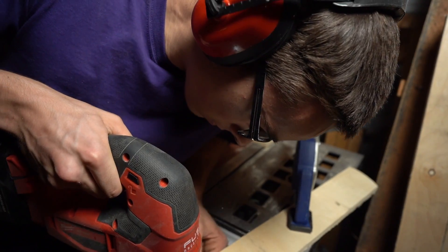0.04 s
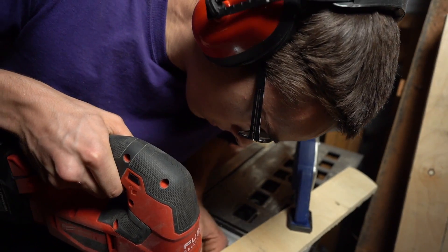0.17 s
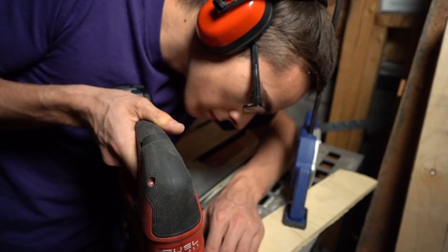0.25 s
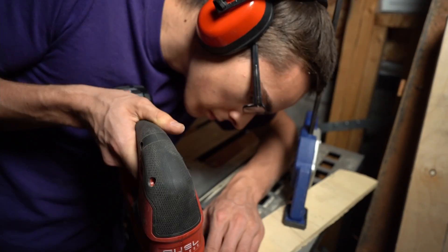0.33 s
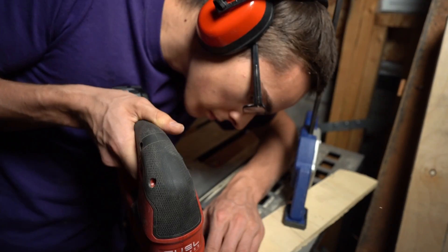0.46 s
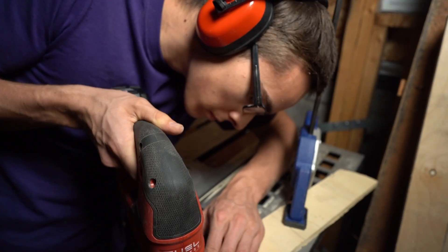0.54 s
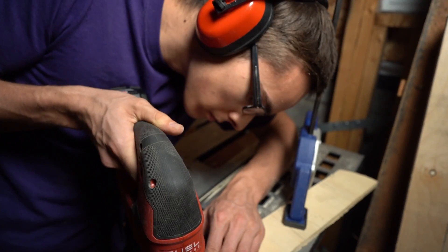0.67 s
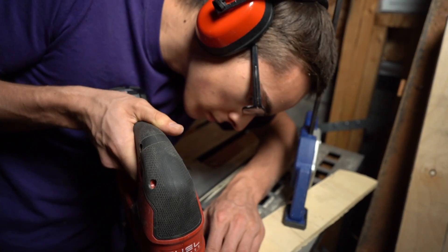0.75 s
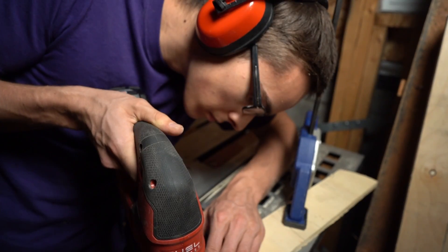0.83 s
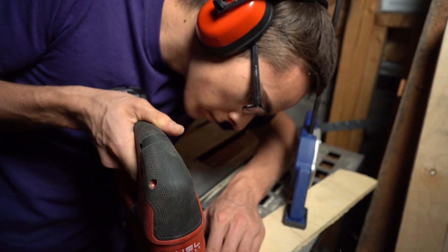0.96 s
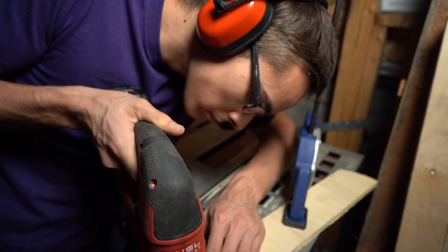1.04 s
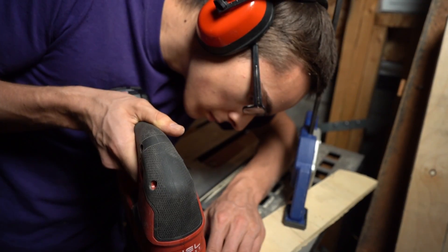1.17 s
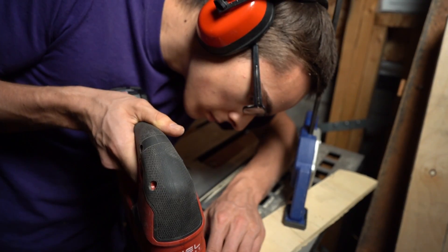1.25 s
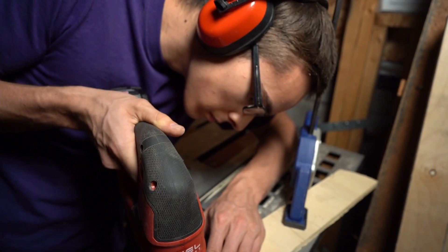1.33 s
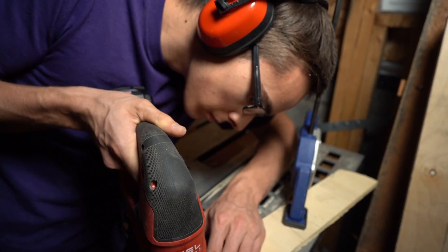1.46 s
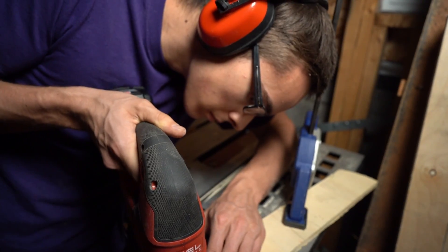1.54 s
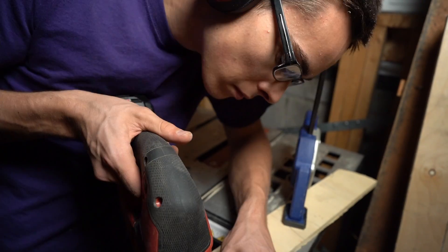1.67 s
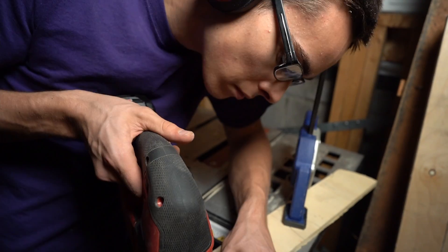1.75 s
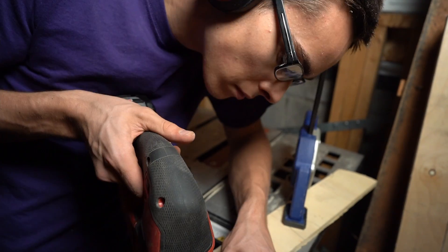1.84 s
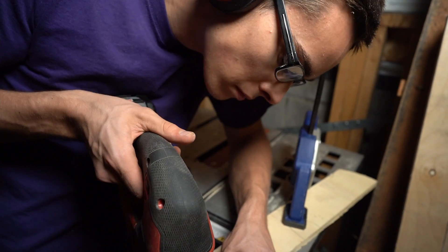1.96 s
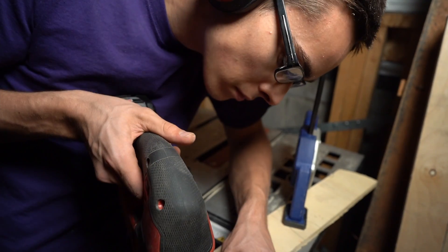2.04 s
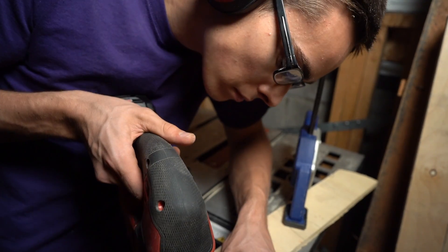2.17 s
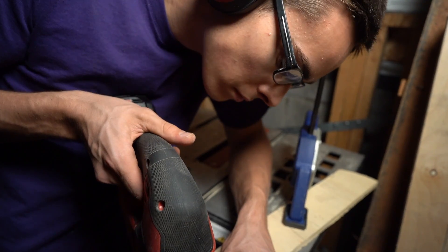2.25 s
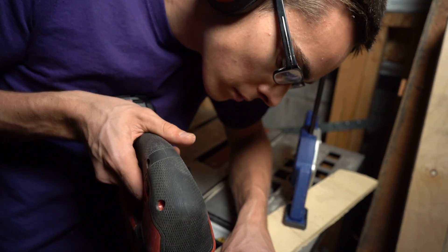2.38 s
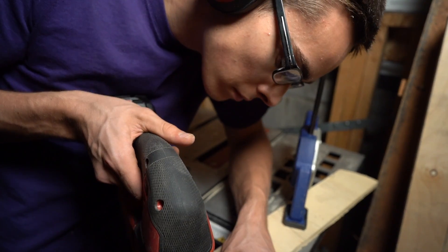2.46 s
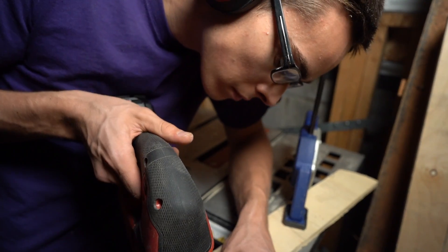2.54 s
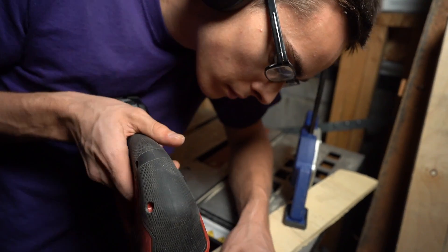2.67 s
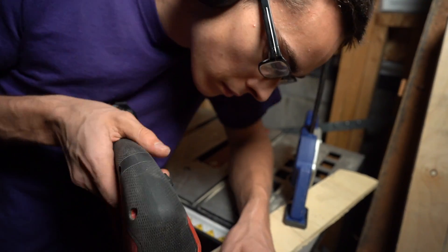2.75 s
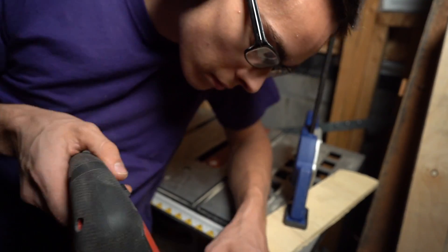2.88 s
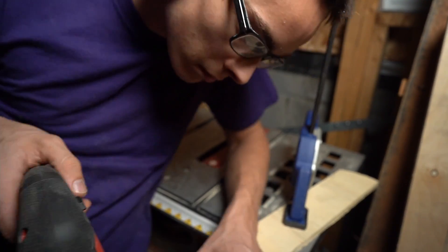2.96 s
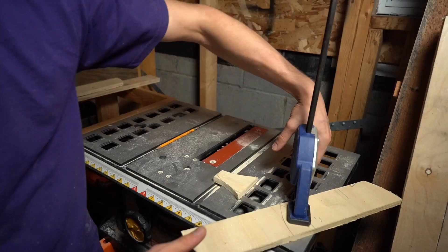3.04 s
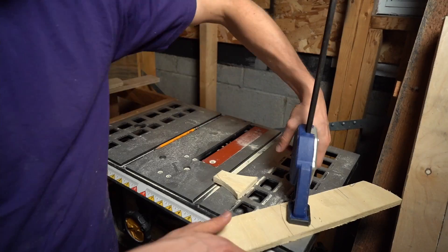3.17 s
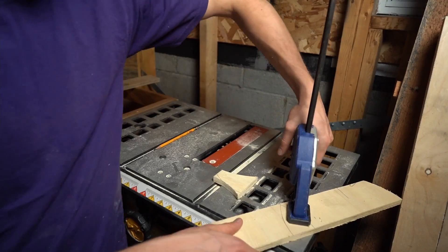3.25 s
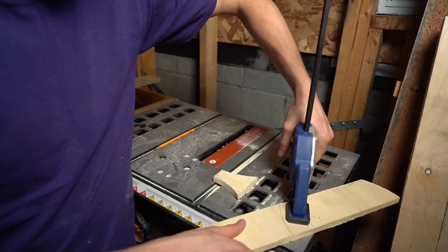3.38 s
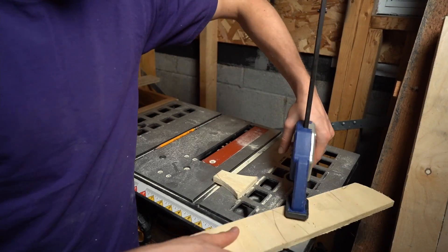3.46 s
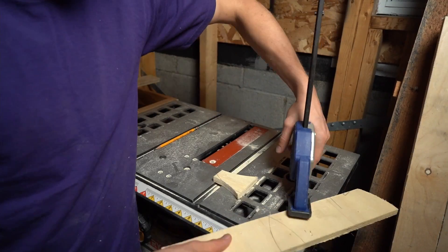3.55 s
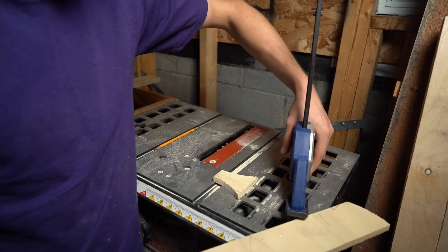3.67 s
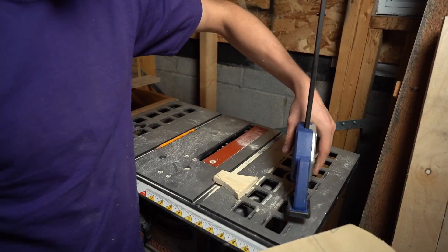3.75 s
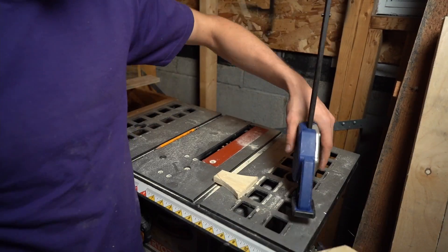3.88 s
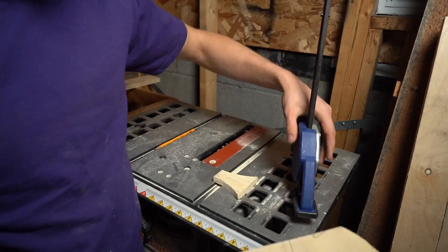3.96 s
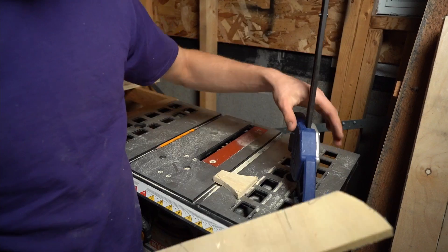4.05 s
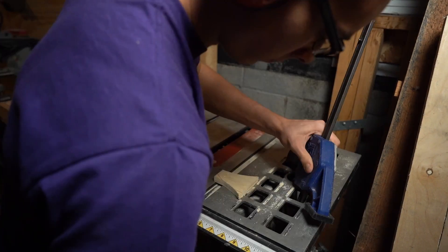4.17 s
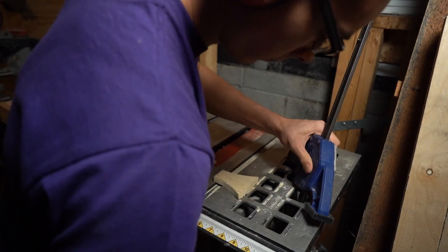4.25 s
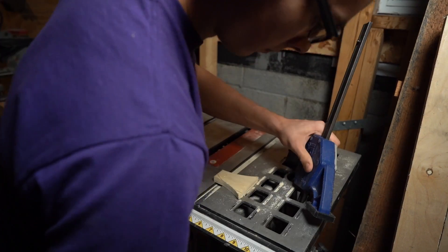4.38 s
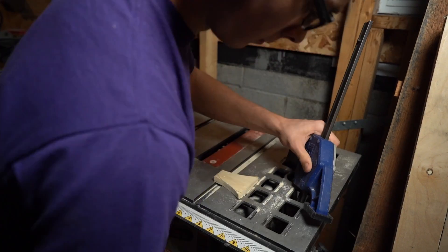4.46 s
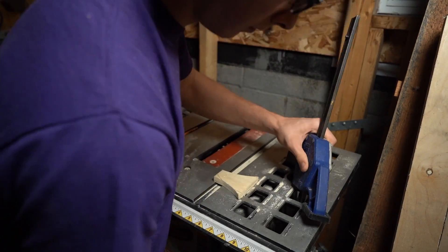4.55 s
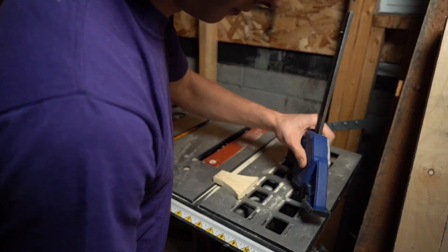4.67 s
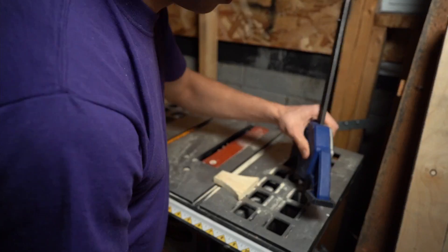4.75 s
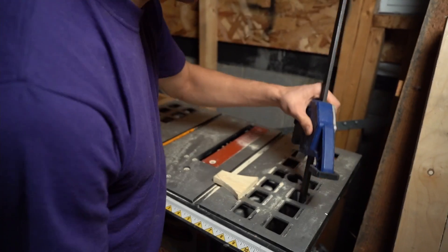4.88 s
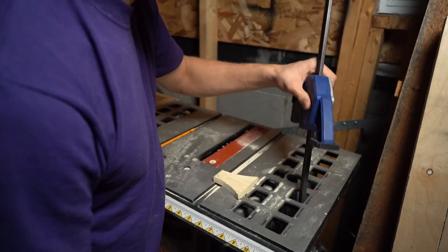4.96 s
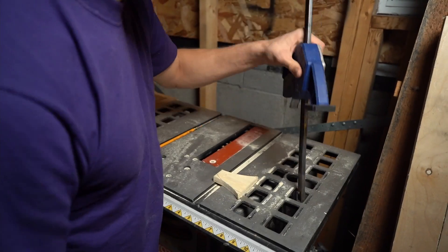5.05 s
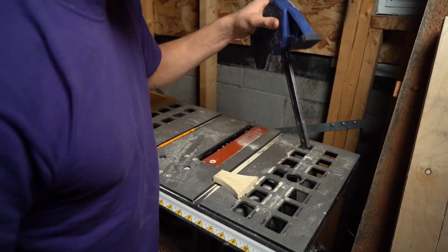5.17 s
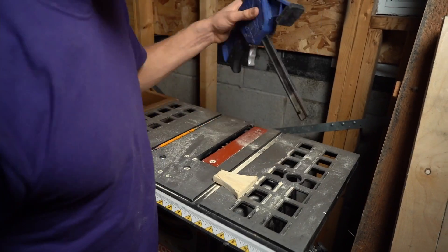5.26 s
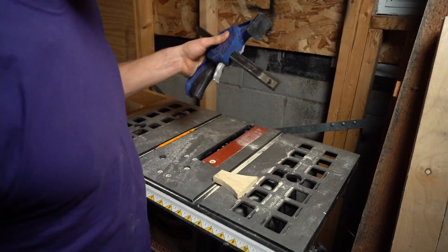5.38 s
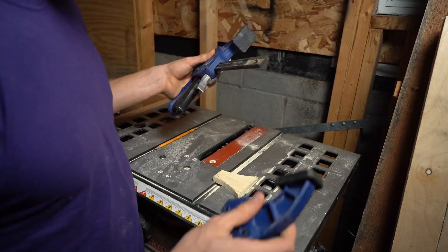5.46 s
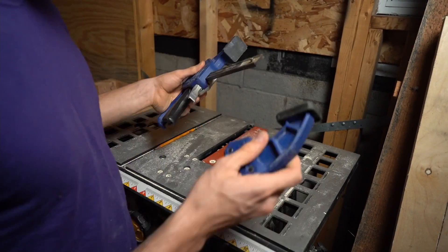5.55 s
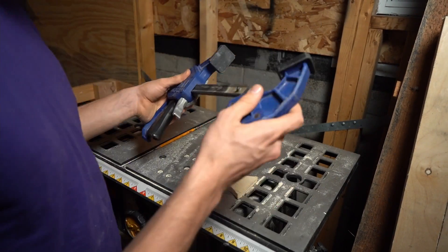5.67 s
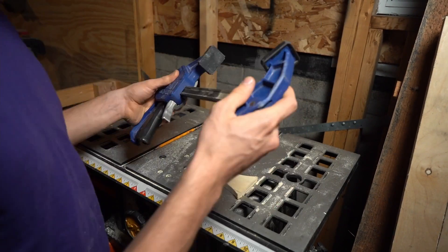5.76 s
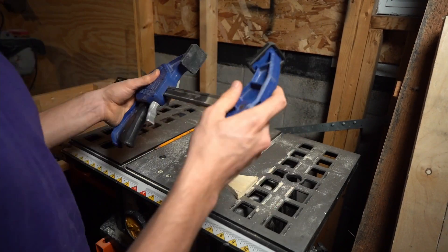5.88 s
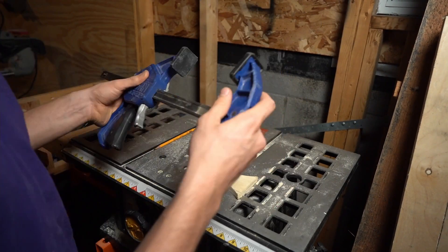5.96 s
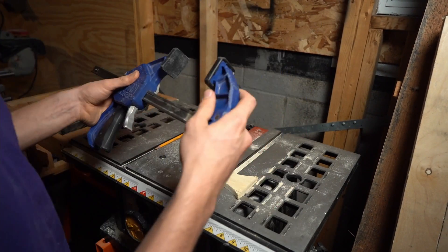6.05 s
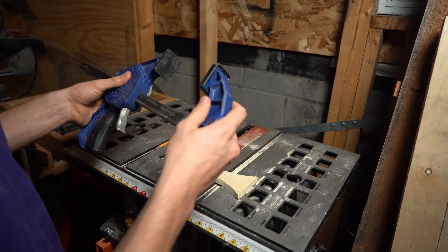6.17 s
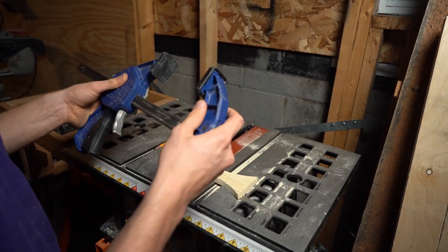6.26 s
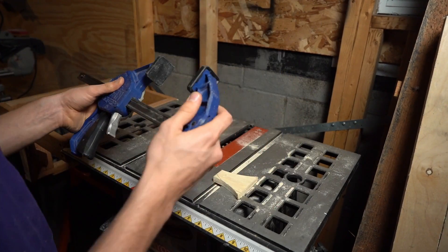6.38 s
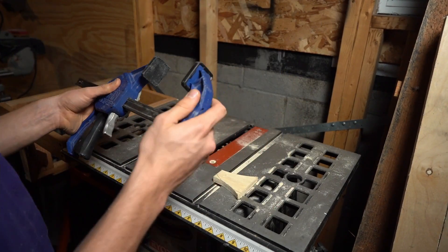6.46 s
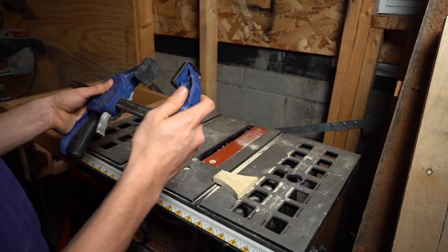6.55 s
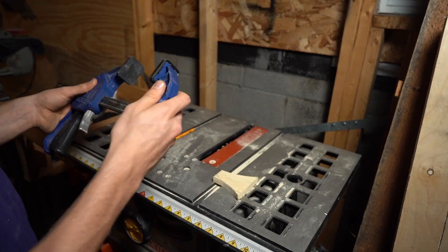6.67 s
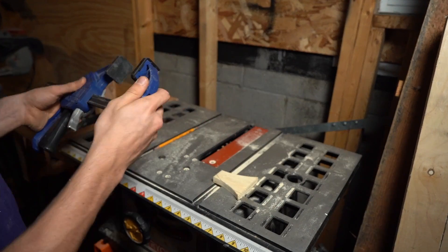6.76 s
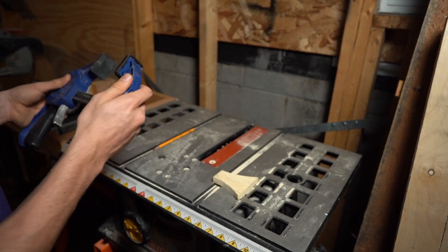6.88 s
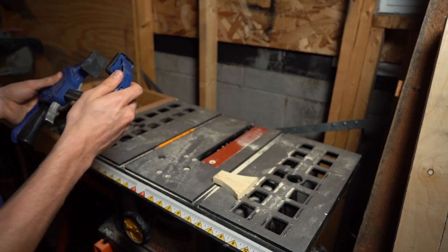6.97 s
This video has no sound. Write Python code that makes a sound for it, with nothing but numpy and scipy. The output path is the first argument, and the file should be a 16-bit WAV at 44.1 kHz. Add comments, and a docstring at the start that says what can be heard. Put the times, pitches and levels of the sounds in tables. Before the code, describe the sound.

A jigsaw cuts wood right beside an overloaded microphone in a small workshop: a dense, raspy, rattling buzz near sixty strokes a second, flattened by clipping. At about 1.7 s a second stretch bites in more softly, slightly slower, then drops in pitch near 1.9 s while the blade squeals around 2.5 kHz. At 2.7 s the cut frees and the motor dies within a fraction of a second, leaving tiny clicks over faint air and machine hum. From 3.25 to 3.55 s a board knocks hard on a metal table, with a short clear steel ring. Softer bumps and rubs follow from 3.8 to 4.7 s as a clamp is released. A sharp clack at 4.8 s leads into a rising metallic scrape, ending at 5.1 s. A loud double snap comes at 5.74 s, then light plastic clicks and soft rubs around 6.0 and 6.7 s.

```python
"""A jigsaw cuts a board close to an overloaded microphone in a small workshop, then runs down; at 1.662 s its
speed and level step down suddenly. Its sound is noise shaped by the blade strokes, plus motor tones locked to
them and a blade squeal. The saw is put aside, the board knocks on a metal saw table, and a bar clamp is
released, drawn out of the table and handled: bursts of dying modes, held steel tones and noisy rubs. Room air
and the hum of a machine, made of noise through resonances and one tone, lie behind."""
import sys
import numpy as np
from scipy import signal
from scipy.fft import rfft, irfft, next_fast_len
from scipy.io import wavfile

SR = 44100
rng = np.random.default_rng(int(sys.argv[2]) if len(sys.argv) > 2 else 0)


def persist_wave(psi):
    """Save psi, clipped to +-1, as 16-bit WAV."""
    counts = np.round(np.clip(psi, -1, 1) * 32767).astype(np.int16)
    wavfile.write(sys.argv[1], SR, np.atleast_2d(counts).T)


N = 309572
T = np.arange(N) / SR  # time of every sample, in seconds

# how fast the blade moves before it runs down; the speed steps suddenly at 1.662 s: # time_s, strokes_per_s
STROKE_SPEED = [(0, 59.55), (1.55, 59.55), (1.66, 60), (1.664, 55.9), (1.86, 57.4), (1.88, 46.9),
                (2.1, 50.1), (2.38, 51.1), (2.5, 49.9), (2.6, 47), (2.7, 46.7)]
# sound of the cut, as a spectrum: pitch_hz, relative level_db (per Hz)
CUT_SPECTRUM = [(20, -20), (150, -32.5), (260, -9.5), (340, -2.5), (620, -1.5), (1100, 2.5), (2200, 1),
                (3200, 2.5), (3950, 1.5), (4700, -8.5), (8000, -14.5), (11000, -22), (16000, -27)]
STOP_S = 2.7056  # the cut ends and the motor starts to run down
COAST_S = 0.25  # time for the coasting motor to fall to 37 % of its speed
WHINE_ORDER = 156  # motor whine, in cycles per blade stroke


def jigsaw(rasp_db=-1, rattle_db=-12, buzz_db=6.0, pump=0.15):
    """Teeth rasp on every stroke, the gear train buzzes and rattles, the motor whines, the blade squeals."""
    speed = curve(STROKE_SPEED) * np.exp(-since(STOP_S) / COAST_S)
    strokes = np.cumsum(speed * (1 + 0.0011 * drift(14))) / SR
    turn = 2 * np.pi * strokes  # one full circle per stroke
    effort_db, gear_db = saw_effort()

    teeth = 1 + pump * np.cos(turn) + 0.21 * np.cos(2 * turn)
    teeth = teeth * amp(0.64 * drift(30))
    rasp = colour(teeth * rng.standard_normal(N), CUT_SPECTRUM)

    body = amp(rasp_db) * rasp
    body += amp(rattle_db) * gear_rattle(strokes)
    body += amp(buzz_db + gear_db) * gear_buzz(turn)
    return amp(effort_db) * (body + blade_squeal(teeth, turn, speed) + motor_whine(turn))


def gear_rattle(strokes):
    """The mechanism repeats the same pattern of small impacts on every stroke."""
    pattern = rng.standard_normal(700)
    impacts = np.interp(strokes % 1, np.linspace(0, 1, len(pattern)), pattern)
    rattle = colour(impacts, CUT_SPECTRUM)
    # small parts rattle high
    return signal.sosfilt(signal.butter(4, 1200, "high", fs=SR, output="sos"), rattle)


# strong multiples of the stroke rate; the motor turns 6.5 times a stroke:
# multiple (times the stroke rate), relative level_db
BUZZ_ORDERS = [(4, -31), (5, -22), (6, -33), (6.5, -23), (7, -23.2), (8, -25.5), (9, -31), (12, -17.7),
               (13, -20.5), (14, -24.5), (15, -28), (17, -27), (18, -24), (20, -27), (25, -26), (26, -23.5),
               (28, -25.5), (30, -27), (34, -26.5), (36, -24.5), (40, -27.5), (49, -26), (52, -28),
               (53, -20), (62, -28), (70, -29), (72, -27)]


def gear_buzz(turn):
    """Turning parts sound at multiples of the stroke rate, each wavering in strength."""
    waver = 0.18 * drift(6)
    buzz = np.zeros(N)
    for multiple, level_db in BUZZ_ORDERS:
        strength = 1 + np.roll(waver, rng.integers(N))
        buzz += amp(level_db) * strength * np.cos(multiple * turn + 2 * np.pi * rng.random())
    return buzz


def motor_whine(turn, whine_db=-19.5):
    """A high tone follows the motor speed, unsteady in level and phase."""
    return amp(whine_db + 2 * drift(40)) * np.cos(WHINE_ORDER * turn + 0.3 * drift(120))


# the blade squeals when a third of the motor whine meets its resonance
SQUEAL_HZ, SQUEAL_WIDTH_HZ, SQUEAL_DB = 2510, 210, -5


def blade_squeal(teeth, turn, speed, tone_db=0.0, blade_db=-5.5, blade_hz=2540, blade_width_hz=260):
    """As the motor slows, a tone at a third of the whine falls into the blade's resonance and sings out."""
    tone = teeth * np.cos(WHINE_ORDER / 3 * turn + 0.25 * drift(60))
    blade = resonate(teeth * rng.standard_normal(N), blade_hz, blade_width_hz)
    blade = resonate(blade, blade_hz, blade_width_hz)
    mistuning_hz = WHINE_ORDER / 3 * speed - SQUEAL_HZ
    response = amp(SQUEAL_DB) / np.hypot(1, 2 * mistuning_hz / SQUEAL_WIDTH_HZ)
    return response * (amp(tone_db) * tone + amp(blade_db) * blade)


# parts of the sawing, the second beginning with a sudden step: start_s, level_db, # soft_start_db (how much
# softer the part starts), gear_buzz_db (added to the buzz)
SAWING = [(0, -2, 0, 0.5), (1.662, -4, 7, -8)]
BITE_S = 0.13  # time constant of biting in
EASE_DB, EASE_S = 10.5, 0.056  # the push eases just before the cut ends
FREE_DB, FREE_S = 18.5, 0.036  # then the blade comes free
COAST_DB_PER_S = 122  # and the motor coasts down


def saw_effort():
    """Levels of the saw and of its gear buzz in dB: it bites in, holds, eases off, comes free and coasts."""
    level_db, gear_db = np.zeros((2, N))
    for start_s, cut_db, soft_start_db, buzz_db in SAWING:
        biting_db = cut_db - soft_start_db * np.exp(-since(start_s) / BITE_S)
        level_db = np.where(T >= start_s, biting_db, level_db)
        gear_db = np.where(T >= start_s, buzz_db, gear_db)
    easing_db = EASE_DB * np.exp(np.minimum(T - STOP_S, 0) / EASE_S)
    freeing_db = FREE_DB * (1 - np.exp(-since(STOP_S) / FREE_S))
    coasting_db = COAST_DB_PER_S * since(STOP_S)
    return level_db - easing_db - freeing_db - coasting_db, gear_db


# knocks of board and table, and the clamp bar catching as it is drawn (the last row), levels relative:
# time_s, thud_db, thud_centre_hz, clack_db, clack_centre_hz,
# tick_db, tick_tilt_db (per octave), clack_t60_s (time to die by 60 dB)
BLOWS = [(3.2601, -13.5, 580, -7, 880, -10.5, -1, 0.026), (3.336, -25.5, 280, -21.5, 3400, -27, 1.5, 0.084),
         (3.379, -35, 500, -16, 1680, -37, -3, 0.1), (3.4577, -12.5, 270, -0.5, 2420, -12, 3, .069),
         (3.53, -12.5, 466, -6, 2400, -24, 2.5, 0.073), (3.843, -27.5, 497, -35.5, 1390, -60, -3, 0.052),
         (4.378, -24, 316, -28.5, 1510, -42, 1, .089), (4.46, -27, 298, -25.5, 2630, -32, 1, 0.054),
         (4.6312, -19, 290, -14, 1460, -20.5, -3.5, 0.039), (4.801, -17.5, 925, 0, 2300, -6, -11, .027),
         (4.84, -20, 140, -20, 1000, -48, 0, 0.074), (4.932, -28, 540, -15.5, 3000, -20, -11, 0.035)]
# a heavy blow drops back once, softer and duller, usually lower
HEAVY_DB = -25  # a louder thud than this counts as heavy
REBOUND_S, REBOUND_T60_S = 0.024, 0.09
REBOUND_HZ, REBOUND_PITCH_SHARE = 135, 0.22  # its centre: a base plus a share of the blow's own
REBOUND_THUD_DB, REBOUND_CLACK_DB, REBOUND_TICK_DB = -4.5, -16.5, -29


def knocks():
    """Board and table knock and the drawn bar catches; each heavy blow is followed by its rebound."""
    out = np.zeros(N)
    for time_s, thud_db, thud_hz, clack_db, clack_hz, tick_db, tilt_db, t60_s in BLOWS:
        add(out, time_s, knock(thud_db, thud_hz, clack_db, clack_hz, tick_db, tilt_db, t60_s))
        if thud_db > HEAVY_DB:
            rebound_hz = REBOUND_HZ + REBOUND_PITCH_SHARE * thud_hz
            rebound = knock(thud_db + REBOUND_THUD_DB, rebound_hz, clack_db + REBOUND_CLACK_DB, clack_hz,
                            tick_db + REBOUND_TICK_DB, tilt_db, REBOUND_T60_S)
            add(out, time_s + REBOUND_S, rebound)
    return out


# ways the metal table vibrates: pitch_hz, relative level_db, t60_s
TABLE_MODES = [(119.9, -22, 1), (144.5, -5.5, 0.27), (187, -3, 0.089), (247, -3.5, 0.14), (287.5, 0, 0.11),
               (345.7, 3, 0.094), (421, -7.5, 0.2), (459, -13, 0.27), (499.5, 6, 0.11), (560.4, 5.5, 0.13),
               (608, 0.5, 0.087), (682, -3.5, 0.13), (780, 0, 0.17), (844, -3.5, 0.12), (1004, 0.5, 0.11),
               (1115, -1, 0.23)]


def knock(thud_db, thud_hz, *contact):
    """One blow: the table thuds under a hard contact."""
    sound = amp(thud_db + 6) * ring(TABLE_MODES, thud_hz, focus_db=12.0, attack_s=0.0004)
    add(sound, 0, click(*contact))
    return sound


# small hard clicks: the saw running down (first row), the first contact of a blow (4.7966 s),
# plastic parts snapping; levels relative: time_s, clack_db, centre_hz, tick_db, tick_tilt_db (per octave)
SMALL_CLICKS = [(2.867, -34.5, 1370, -54, -2), (3.083, -45, 1000, -62, 0), (3.187, -34, 2500, -44, 2),
                (3.203, -28, 2370, -33, 12), (4.354, -31, 1530, -35, -3), (4.54, -32, 3000, -39, 0),
                (4.555, -27, 3500, -26.5, -7), (4.7966, -21, 2300, -34, -4), (5.34, -40, 2620, -47, 9),
                (5.7403, -3, 1690, -20, 9), (5.744, -7, 2850, -18, 6), (5.96, -44, 1090, -62, -1),
                (6.0163, -25, 3300, -56, -5), (6.033, -16.5, 3420, -24, -11), (6.073, -17, 2550, -37, -5),
                (6.089, -19, 2820, -22, -7), (6.417, -27.5, 1940, -64, -5), (6.699, -41.5, 3260, -54, -3),
                (6.745, -19, 3360, -26, -8)]
# the harder the click, the drier: t60 at 0 dB, and the drop in level that doubles it
CLICK_T60_S, CLICK_DOUBLING_DB = 0.015, 21
# a firm click shakes a loose part, which rattles a moment later
FIRM_DB = -23  # a louder clack than this counts as firm
RATTLE_DELAY_S, RATTLE_SPREAD_S = 0.035, 0.08
RATTLE_DB, RATTLE_HZ, RATTLE_T60_S = -42.5, 1990, 0.031


def small_clicks():
    """Small hard parts click; each firm click is followed by the rattle of a loose part."""
    out = np.zeros(N)
    for time_s, clack_db, centre_hz, tick_db, tilt_db in SMALL_CLICKS:
        t60_s = CLICK_T60_S * 2 ** (-clack_db / CLICK_DOUBLING_DB)
        add(out, time_s, click(clack_db, centre_hz, tick_db, tilt_db, t60_s))
        if clack_db > FIRM_DB:
            rattle_s = time_s + RATTLE_DELAY_S + RATTLE_SPREAD_S * rng.random()
            add(out, rattle_s, amp(RATTLE_DB) * burst(CLACK_SPECTRUM, RATTLE_T60_S, RATTLE_HZ, ring_db=7.5))
    return out


# ways the clamp vibrates: pitch_hz, relative level_db, t60_s
CLAMP_MODES = [(1224, 9, 0.03), (1450, -25, .04), (1940, 0.5, 0.023), (2365, 10.5, 0.042),
               (2405, -6, 0.021), (3210, -12, 0.033), (3193, 0.5, 0.042), (3587, 5, 0.065),
               (4170, 4, 0.044), (4580, -5.5, 0.055)]
# dense clack of a hard contact: pitch_hz, relative level_db (per Hz)
CLACK_SPECTRUM = [(100, -23.5), (400, -9.5), (900, 1), (1600, 1.5), (2500, -4.5), (3800, 0), (5000, -14),
                  (8000, -31), (16000, -49)]
# short bright tick of a hard contact: pitch_hz, relative level_db (per Hz)
TICK_SPECTRUM = [(100, -53), (2500, -23.5), (5500, -1), (8000, -5), (11000, -15.5), (16000, -16.5)]


def click(clack_db, centre_hz, tick_db, tick_tilt_db, t60_s):
    """A hard contact: the clamp's own modes, a dense clack and a shorter bright tick."""
    sound = amp(clack_db - 4) * ring(CLAMP_MODES, centre_hz, focus_db=9, attack_s=0.0004)
    add(sound, 0, amp(clack_db + 1.0) * burst(CLACK_SPECTRUM, t60_s, centre_hz, ring_db=7.5))
    add(sound, 0, amp(tick_db - 2.5) * burst(TICK_SPECTRUM, t60_s * 0.85, tilt_db=tick_tilt_db))
    return sound


def burst(points, t60_s, centre_hz=1000, ring_db=0, tilt_db=0):
    """A crowd of short-lived modes with a given spectrum, lifted round one centre by ring_db."""
    t = np.arange(SR // 4) / SR
    hz = np.fft.rfftfreq(len(t), 1 / SR)
    lift_db = ring_db * bump(hz, centre_hz, 0.28)
    slope_db = tilt_db * np.log2(np.maximum(hz, 4000))  # tilts only above 4000 Hz
    shape = amp(read(points, hz) + lift_db + slope_db)
    modes = unit(irfft(shape * np.exp(2j * np.pi * rng.random(len(hz))), len(t)))
    return modes * amp(-60 * t / t60_s) * (1 - np.exp(-t / 0.00042))


def ring(modes, centre_hz, focus_db, attack_s):
    """A struck body; the place of the blow decides which of its modes speak."""
    t = np.arange(SR // 2) / SR
    hz, mode_db, t60_s = np.transpose(modes)[:, :, None]
    size = amp(mode_db + focus_db * bump(hz, centre_hz, 0.46))
    waves = size * amp(-60 * t / t60_s) * np.sin(2 * np.pi * (hz * t + rng.random(hz.shape)))
    return waves.sum(0) / np.linalg.norm(size) * (1 - np.exp(-t / attack_s))


# clamp bar and table singing after the heaviest blows: start_s, pitch_hz, level_db, held_s, t60_s
STEEL_TONES = [(3.46, 1675, -11.5, .07, .19), (3.46, 2558, -26, .09, .72), (3.53, 545, -21, .035, .2),
               (3.29, 255, -27, .06, .2)]


def steel():
    """Clear tones, held while the parts stay in contact and then dying away."""
    out, t = np.zeros(N), np.arange(SR) / SR
    for start_s, hz, db, held_s, t60_s in STEEL_TONES:
        level_db = db - 60 * np.maximum(t - held_s, 0) / t60_s
        add(out, start_s, amp(level_db) * np.sin(2 * np.pi * hz * t) * (1 - np.exp(-t / 0.007)))
    return out


def friction(grain_db=2.5):
    """Tiny slips, a noise of uneven strength, drive both the soft rubs and the scraping bar."""
    slips = rng.standard_normal(N) * amp(grain_db * drift(270))
    return soft_rubs(slips) + drawn_bar(slips)


# soft rubs and slides; the first is the coasting saw mechanism rattling:
# start_s, end_s, level_db, tilt_db (per octave)
SOFT_RUBS = [(2.822, 2.88, -39.5, -4), (3.012, 3.146, -53.5, 1), (3.31, 3.48, -35.5, -1),
             (3.63, 3.778, -50, 4.5), (4.147, 4.207, -47, 3), (4.529, 4.596, -33, -5),
             (4.64, 4.811, -50, 1), (4.68, 4.727, -28, -3), (5.34, 5.513, -56, 2),
             (5.945, 6.137, -46.5, -2), (6.023, 6.091, -35, -1.5), (6.697, 6.847, -46, -3),
             (6.967, 7.026, -55.5, 0.5)]
# sound of sliding, as a spectrum: pitch_hz, relative level_db (per Hz)
RUB_SPECTRUM = [(100, -6), (500, -5), (1400, -1), (2500, -2.5), (3700, -1), (5200, -11), (8500, -14.5),
                (11200, -23.5), (12800, -18.5), (14500, -25), (16000, -36)]


def soft_rubs(slips):
    """Soft rubs and slides: short stretches of the slips, coloured and faded in and out."""
    out = np.zeros(N)
    for start_s, end_s, level_db, tilt_db in SOFT_RUBS:
        length = max(round((end_s - start_s) * SR), 64)
        part = slips[round(start_s * SR):][:length]
        rub = colour(part, RUB_SPECTRUM, tilt_db) * signal.windows.tukey(len(part), 0.35)
        add(out, start_s, amp(level_db) * rub)
    return out


# ways the steel clamp bar vibrates: pitch_hz, relative level_db,
# t60_s (of the free bar; contact with the table damps it further)
BAR_MODES = [(527, -5, .4), (1440, -4, .2), (1840, -2, 0.22), (3610, 2, .15), (3900, -2, .15),
             (4500, 1.5, .3), (5130, -9, .5), (6380, -4, .2), (8200, -18, .3), (9100, -25, .15)]
# the clamp bar is drawn through the table: it gathers speed, then slips out
DRAW_START_S, DRAW_END_S, DRAW_RISE_S = 4.855, 5.105, 0.064
DRAW_DB, DRAW_RELEASE_DB_PER_S = -25.5, 900


def drawn_bar(slips, ring_db=-3, scrape_db=-4, chatter_db=1.5, contact_width_hz=70):
    """The steel bar scrapes along the table edge, shaking its own modes and the table top's dense ones."""
    # the bar catches and jumps
    catches = slips * amp(chatter_db * drift(90.3))
    bar = np.zeros(N)
    for hz, level_db, t60_s in BAR_MODES:
        bar += amp(level_db) * resonate(catches, hz, 2.2 / t60_s + contact_width_hz)
    top = np.zeros(N)
    for hz in np.linspace(500, 15500, 50) + rng.uniform(-150, 150, 50):
        top += resonate(catches, hz, 110)
    rise = 1 - np.exp(-since(DRAW_START_S) / DRAW_RISE_S)
    draw = rise * amp(DRAW_DB - DRAW_RELEASE_DB_PER_S * since(DRAW_END_S))
    return draw * (amp(scrape_db) * colour(top, RUB_SPECTRUM) + amp(ring_db) * unit(bar))


# how long the workshop echoes: pitch_hz, t60_s
ROOM_DECAY = [(100, 0.67), (500, 0.41), (2000, 0.29), (4500, 0.25), (9000, .25), (16000, 0.064)]


def room(x):
    """Dense reflections of a small workshop, each band dying at its own speed."""
    times = np.arange(SR) / SR
    # sparse random echoes, none in the first 5 ms
    taps = rng.standard_normal(SR) * (rng.random(SR) < 0.08) * (times > 0.005)
    hz, t, bands = signal.stft(taps, SR, nperseg=256)
    decay = amp(-60 * t / read(ROOM_DECAY, hz)[:, None])
    tail = signal.istft(bands * decay, SR, nperseg=256)[1]
    return signal.fftconvolve(x, tail / np.linalg.norm(tail))[:N]


# noise bands of the background machine: pitch_hz, width_hz (of each of two filter passes), relative level_db
HUM_BANDS = [(108, 24, -56), (290, 27, -58.5), (324.6, 28, -55.5), (555, 40, -68), (900, 70, -58)]
# level at which hum and tone are heard; it creeps up after the loud saw: time_s, level_db (added to both)
HEARD_HUM_LEVEL = [(2.9, -4), (4, 1), (4.5, 2.5), (7, 1.5)]
# room air, as a spectrum: pitch_hz, relative level_db (per Hz)
AIR_SPECTRUM = [(25, -23), (60, -11.5), (115, -7.5), (210, -11.5), (320, -4), (420, -19), (570, -12),
                (700, -23), (900, -17), (1450, -28), (2500, -33), (3900, -33), (5500, -42.5), (16000, -57)]
AIR_DB = -47


def background(tone_hz=323, tone_db=-51):
    """Room air as coloured noise, and the wavering hum of a machine as narrow noise bands and a tone."""
    hum = np.zeros(N)
    for hz, width_hz, level_db in HUM_BANDS:
        band = resonate(rng.standard_normal(N), hz, width_hz)
        hum += amp(level_db) * resonate(band, hz, width_hz)
    wavering_phase = 2 * np.pi * tone_hz * T + 0.65 * drift(4)
    tone = amp(tone_db + 3 + 2 * drift(5)) * np.sin(wavering_phase)
    air = amp(AIR_DB) * colour(rng.standard_normal(N), AIR_SPECTRUM)
    return amp(curve(HEARD_HUM_LEVEL)) * (hum + tone) + air


def amp(db):
    """Decibels to gain."""
    return 10 ** (np.asarray(db) / 20)


def unit(x):
    """Scales to an rms (average strength) of 1."""
    return x / np.sqrt(np.mean(x ** 2) + 1e-20)


def curve(rows):
    """A time table at every sample, in straight lines between its rows."""
    return np.interp(T, *np.transpose(rows))


def since(s):
    """Seconds since time s at every sample, 0 before it."""
    return np.maximum(T - s, 0)


def read(points, hz):
    """A spectrum table on a log-frequency axis."""
    f, value = np.transpose(points)
    return np.interp(np.log(hz + 1), np.log(f + 1), value)


def add(mix, s, sound):
    """Mixes a sound in at time s, in seconds."""
    part = mix[max(round(s * SR), 0):][:len(sound)]
    part += sound[:len(part)]


def colour(x, points, tilt_db=0):
    """Filters x by a spectrum, tilted by dB per octave above 300 Hz; rms 1."""
    size = next_fast_len(len(x), real=True)
    hz = np.fft.rfftfreq(size, 1 / SR)
    gain = amp(read(points, hz) + tilt_db * np.log2(np.maximum(hz, 300)))
    return unit(irfft(rfft(x, size) * gain, size)[:len(x)])


def resonate(x, hz, width_hz):
    """A resonance of the given centre and width; rms 1."""
    pole = np.exp((2j * np.pi * hz - np.pi * width_hz) / SR)
    return unit(signal.lfilter([1], [1, -pole], x).real)


def drift(hz):
    """Slow chance of rms 1 that changes about hz times a second."""
    size = next_fast_len(N, real=True)
    smoothing = np.exp(-(np.fft.rfftfreq(size, 1 / SR) / hz) ** 2)
    return unit(irfft(rfft(rng.standard_normal(size)) * smoothing, size)[:N])


def bump(hz, centre_hz, octaves):
    """A bell on the log-frequency axis, 1 at its centre."""
    return np.exp(-0.5 * (np.log2((hz + 1) / centre_hz) / octaves) ** 2)


def scene(room_db=-10, saw_room_db=-19):
    """Everything reaches one microphone, heard in both ears; the saw is close and so nearly dry."""
    saw = jigsaw()
    handling = knocks() + small_clicks() + friction()
    echoes = room(amp(room_db) * handling + amp(saw_room_db) * saw)
    mono = saw + handling + steel() + echoes + background()
    return np.array([mono, mono])


EDGE_HZ = 15900  # upper edge of the microphone channel


def record(dry, ceiling=0.94, sag=0.44, knee=5):
    """The input clips; its ceiling sinks under a sustained overload. Then the band limits."""
    smoother = [1 - np.exp(-1 / (0.03 * SR))], [1, -np.exp(-1 / (0.037 * SR))]
    # one mirrored second in front lets the smoother settle before the start
    power = signal.lfilter(*smoother, np.pad(dry[0] ** 2, (SR, 0), "reflect"))[SR:]
    limit = ceiling - sag * np.tanh(power / 0.09)
    clipped = dry / (1 + abs(dry / limit) ** knee) ** (1 / knee)
    clipped = signal.lfilter(*signal.butter(1, 35, "high", fs=SR), clipped)
    lowpass = signal.firwin(401, EDGE_HZ, window=("kaiser", 8), fs=SR)
    return signal.oaconvolve(clipped, lowpass[None], "same")


dry = scene()
out = record(dry)
persist_wave(out)
```